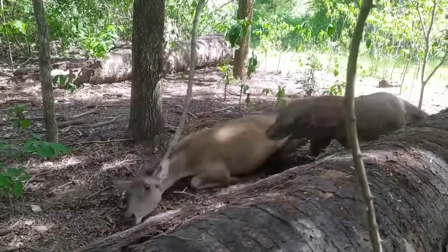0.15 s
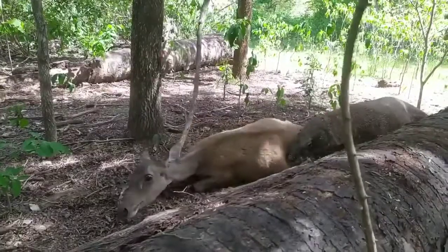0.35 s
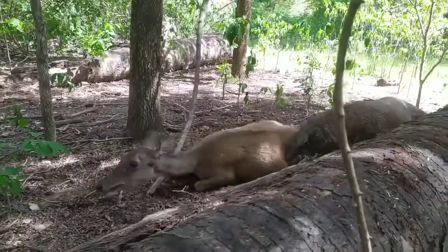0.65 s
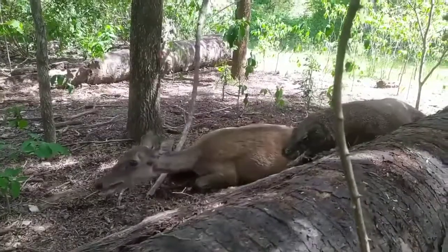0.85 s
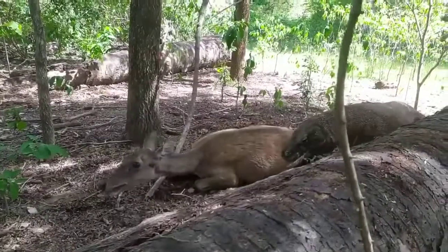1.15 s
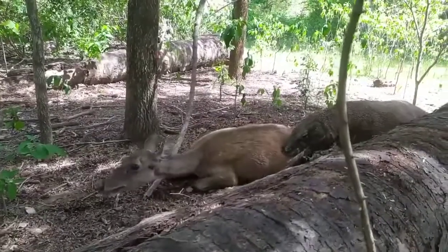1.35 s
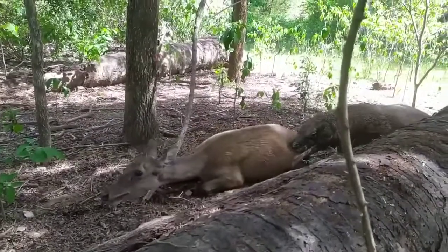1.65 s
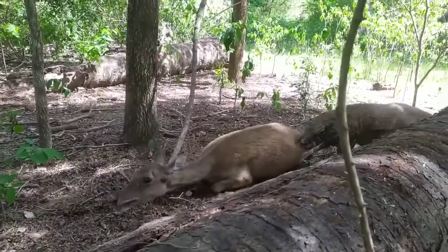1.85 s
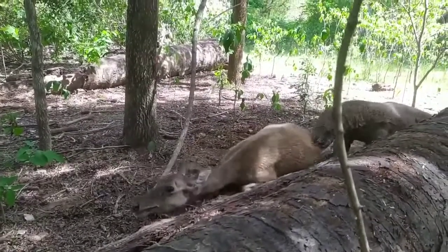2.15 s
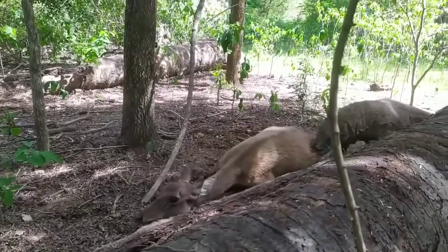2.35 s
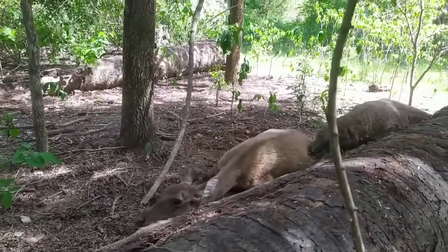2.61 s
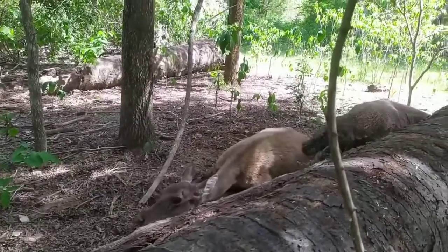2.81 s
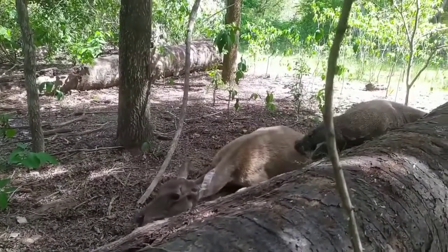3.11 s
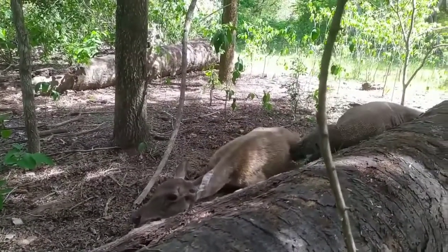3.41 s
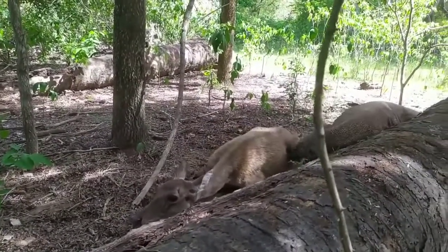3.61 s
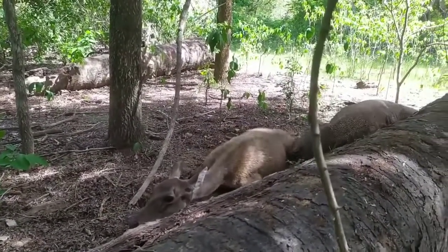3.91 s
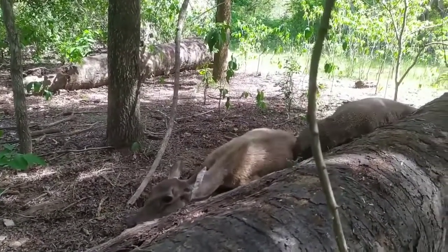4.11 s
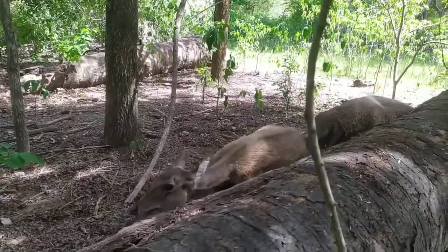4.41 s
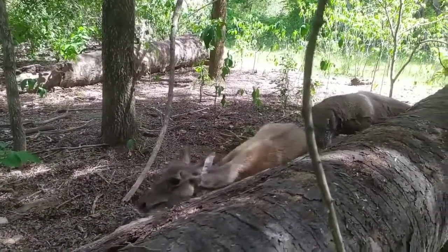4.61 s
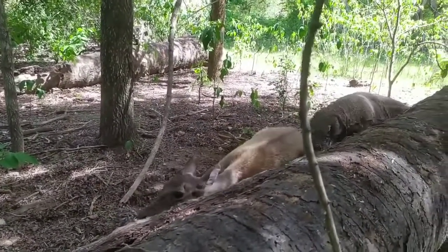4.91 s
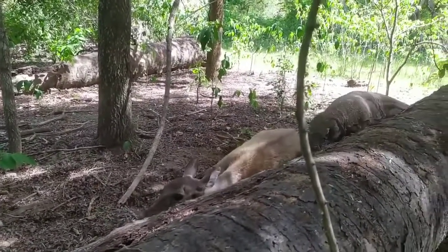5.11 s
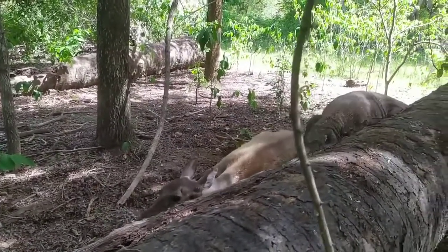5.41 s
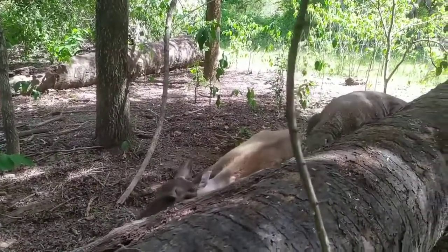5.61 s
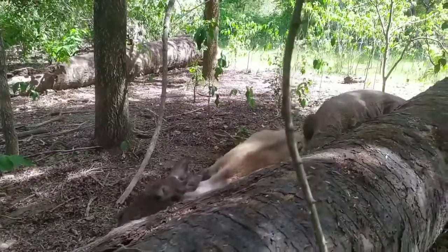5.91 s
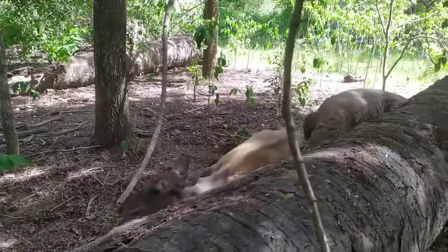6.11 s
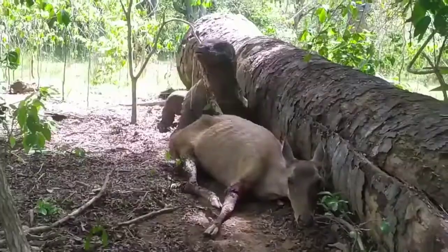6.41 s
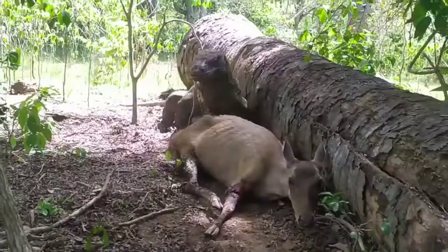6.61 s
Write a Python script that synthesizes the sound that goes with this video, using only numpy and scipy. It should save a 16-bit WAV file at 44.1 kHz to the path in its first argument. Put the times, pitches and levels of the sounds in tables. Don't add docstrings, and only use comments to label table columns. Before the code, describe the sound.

Outdoors among trunks, a large animal shifts on dry litter, rustling, rubbing bark and thumping soft soil. A single deer bleat dominates the middle, starting rough, breaking upward into a fluttering squeal and slackening back to a growl, with short woody echoes. Afterwards come scattered twig cracks, a splitting stick, leaf slips and two quiet closed-mouth grunts. Distant dove, small bird near the end, steady dull engine; two spaced microphones.

```python
import sys
import numpy as np
from scipy import signal
from scipy.io import wavfile
from scipy.ndimage import uniform_filter1d

SR = 44100
rng = np.random.default_rng(int(sys.argv[2]) if len(sys.argv) > 2 else 0)


def master_out(mix):
    frames = np.transpose(np.atleast_2d(mix))
    ceiling = np.clip(frames, -1, 1)
    pcm = np.round(ceiling * 32767).astype(np.int16)
    wavfile.write(sys.argv[1], SR, pcm)


def amplitude_ratio(level_db):
    exponent = np.asarray(level_db, float) / 20
    return 10 ** exponent


N = 297675

# centre_hz, width_hz, level_db
OPEN_THROAT = [(343, 170, -6.5), (570, 177, -1), (759, 43, 13.5), (1435, 322, 0.5), (1745, 61, 9),
               (1955, 132, 4.5), (2380, 400, -8.5), (2900, 230, -17), (3840, 200, -31), (5200, 640, -18.5),
               (6700, 730, -20.5), (8400, 820, -19.5)]
# time_s, gain_db
BACKGROUND_DIP = [(2.35, 0.5), (2.5, -1.5), (2.85, -4), (3.2, -7), (3.62, -10.5), (3.7, -1.5)]
LITTER_DROP_S = 6.235


def deer():
    # time_s, left_delay_samples
    head = [(2.3, 10.8), (2.75, 12.1), (2.9, 11.8), (3.1, 11), (3.2, 14.45), (3.3, 11.14), (3.7, 12.2)]
    voice = rising_growl() + falling_growl() + squeal()
    voice = butter(voice, 4, 11000, "low")
    heard = add_echoes(place(voice, in_time(head)[0] / SR))
    return heard + jet() + forest(heard) + place(grunts(), 0.00031, pan_db=2.0)


def squeal():
    # time_s, pitch_hz, first_db, second_over_first_db, third_over_first_db
    registers = [
        [(2.67, 579, -30, -18, -16.5), (2.692, 619.4, -21, -23, -15), (2.715, 670.3, -18.5, -15.5, -21),
         (2.75, 719, -26, -11.5, -18.5), (2.776, 749, -26, -15, -17.5)],
        [(2.778, 844, -24, -5, -20.5), (2.802, 954, -32, 5.5, -17.5), (2.852, 1047, -28.5, -3.5, -13),
         (2.93, 1089, -29.5, 4, -15.5), (3.01, 1136, -26.5, -8.5, -22), (3.06, 1101, -26, 1.5, -17.5),
         (3.104, 1056, -20.5, 1, -16), (3.135, 984, -18, 8, -18), (3.166, 919, -17, -6, -25)],
        [(3.174, 767.5, -11, -10.5, -17), (3.23, 731, -9, -4.5, -7.5), (3.265, 715.7, -19.5, -8, -1),
         (3.275, 672, -40, -9, 6)],
    ]
    # partial_hz, level_db
    higher_spectra = [
        [(2400, -41), (3500, -51.5), (4000, -63.5), (9000, -81)],
        [(3700, -52.5), (4500, -50.5), (5400, -49.5), (6500, -54), (7600, -62.5), (8750, -50), (9900, -61.5),
         (11500, -73.5)],
        [(2900, -31), (3700, -43.5), (4500, -44.5), (5300, -50), (6700, -58.5), (9000, -58)],
    ]
    # time_s, level_db
    half_lines = [(2.675, -66.5), (2.7, -44.5), (2.725, -41), (2.75, -71)]
    # time_s, upper_partials_db
    closure_snap = [(2.8, -2), (2.88, 0), (2.95, -3.5), (3.02, 6), (3.07, 0), (3.14, 10.5), (3.168, 6.5),
                    (3.174, -5.5), (3.21, 4.5), (3.275, -10)]
    # time_s, centre_hz, gain_db
    cavity = [(2.9, 6400, 0), (2.95, 6100, -11.5), (3.03, 5650, -14.5), (3.085, 5300, -23),
              (3.135, 4500, -12), (3.168, 4300, -14), (3.174, 4300, 0.5)]
    cavity_width_hz, settled_s = 770, 2.79

    rows = sum(registers, [])
    now, out = during(rows), np.zeros(N)
    hz, first_db, second_db, third_db = np.array(in_time(rows))[:, now]
    upper_db = np.zeros((9, len(hz)))
    for register, spectrum in zip(registers, higher_spectra):
        inside = sounding(register)[now] > 0
        hz[inside] = uniform_filter1d(in_time(register)[0], size=900)[now][inside]
        since = np.arange(N)[now] >= register[0][0] * SR
        upper_db[:, since] = at_hz(spectrum, np.arange(4, 13)[:, None] * hz[since])

    unsettled = np.arange(N) < settled_s * SR
    waver = 0.0015 * drift(70) + 0.008 * drift(200) * unsettled
    phase = 2 * np.pi * np.cumsum(hz * (1 + waver[now])) / SR

    cavity_hz, cavity_db = np.array(in_time(cavity))[:, now]
    snap_db = in_time(closure_snap)[0][now]
    half_db = (in_time(half_lines)[0] - 60 * (1 - sounding(half_lines)))[now]
    levels = [(1, first_db), (2, first_db + second_db), (3, first_db + third_db)]
    for k, db in enumerate(upper_db, 4):
        swallowed_db = cavity_db * np.exp(-((k * hz - cavity_hz) / cavity_width_hz) ** 2)
        levels.append((k, db + snap_db + swallowed_db))
    for k, db in enumerate([-8.5, 7.5, 4, -3.5], 1):
        levels.append((k + 0.5, db + half_db))
    for k, db in levels:
        flutter_db = 0.45 * min(k, 4) * drift(15)[now]
        out[now] += amplitude_ratio(db + 1.5 + flutter_db) * np.sin(k * phase + 0.66 * k ** 2)

    low_throat = [row for row in OPEN_THROAT if row[0] < 1000]
    breath = rms_one(body(rng.standard_normal(len(hz)), low_throat))
    out[now] += amplitude_ratio(first_db - 40 + 10 * unsettled[now]) * breath
    return sounding(rows) * out


def rising_growl():
    # time_s, pulse_rate_hz, roughness_0_to_1, chest_db
    pulses = [(2.28, 88, .5, -55), (2.34, 92, .6, -50), (2.5, 101, .6, -50), (2.56, 110, .5, -55),
              (2.575, 200, .2, -68), (2.685, 236, .2, -76)]
    # time_s, level_db
    effort = [(2.28, -74), (2.308, -54), (2.316, -48.5), (2.372, -34), (2.428, -39), (2.568, -33),
              (2.586, -38.5), (2.655, -32.5), (2.685, -47)]
    # time_s, centre_hz
    lips = [(2.3, 673), (2.37, 672), (2.431, 690), (2.46, 650), (2.5, 650), (2.54, 646.5), (2.575, 672),
            (2.599, 601), (2.66, 663)]
    # centre_hz, width_hz, level_db
    throat = [(245, 63, -25.5), (377.5, 60, -3), (470, 190, -7.5), (644, 20.4, 8), (900, 71, -16.5),
              (1618, 280, -15), (2473, 160, -15.5), (2950, 310, -23), (3460, 360, -26), (3580, 140, -22.5),
              (6640, 440, -33), (8740, 680, -36.5)]
    # time_s, pitch_hz, level_db
    glide = [(2.42, 214.6, -61), (2.48, 261.7, -57), (2.54, 309.1, -54), (2.586, 392.4, -42),
             (2.602, 418.3, -46.5), (2.639, 441.6, -44.5), (2.665, 472, -49.5), (2.68, 570, -45.5)]
    hz, rough, chest_db = in_time(pulses)
    voice = growl(pulses, hz, in_time(effort)[0] + 2.0, rough, chest_db, throat, lips)
    octave = np.array(glide) * [1, 2, 1] - [0, 0, 15.0]
    return voice + tone(glide) + tone(octave)


def falling_growl():
    # time_s, pulse_rate_hz, roughness_0_to_1
    pulses = [(3.265, 142, .7), (3.396, 125.4, .4), (3.44, 117.3, .05), (3.506, 108, .04),
              (3.594, 101.8, .04), (3.64, 92.6, .08), (3.678, 81, .18), (3.71, 78, .25)]
    # time_s, level_db, chest_db
    effort = [(3.265, -26.5, -45), (3.297, -24, -40), (3.419, -30.5, -38.5), (3.649, -32, -40),
              (3.672, -45, -44.5), (3.69, -47, -45), (3.71, -82, -67)]
    # time_s, centre_hz
    lips = [(3.265, 770), (3.31, 767), (3.37, 750), (3.419, 810), (3.451, 752), (3.522, 784), (3.598, 739),
            (3.66, 740), (3.71, 634)]
    hz, rough = in_time(pulses)
    level_db, chest_db = in_time(effort)
    return growl(pulses, hz, level_db + 3.5, rough, chest_db, OPEN_THROAT, lips)


def grunts():
    # time_s, pulse_rate_hz, level_db
    pulse_trains = [
        [(5.8, 106, -66), (5.828, 114, -54), (5.904, 123, -49), (5.96, 70, -68)],
        [(6.03, 140, -76), (6.056, 102, -44.5), (6.13, 144, -68.5)],
    ]
    # centre_hz, width_hz, level_db
    throat = [(252, 62, 11.5), (407, 110, 7), (567, 120, 5.5), (900, 85, 3), (1097, 30, 6)]
    out = np.zeros(N)
    for rows in pulse_trains:
        hz, level_db = in_time(rows)
        out += growl(rows, hz, level_db, np.full(N, 0.35), level_db - 9, throat)
    return out


def growl(rows, hz, level_db, rough, chest_db, throat, lips=None):
    cycles = np.cumsum(hz * (1 + 0.035 * rough * drift(60))) / SR
    closures = np.diff(np.floor(cycles), prepend=0)
    pulses = closures * amplitude_ratio(3.0 * rough * drift(150)) * np.sqrt(SR / hz)
    breath = rng.standard_normal(N) * (0.91 + np.exp(-3 * (cycles % 1)))

    now, voiced = during(rows), np.zeros(N)
    strongest_db = max(row[2] for row in throat)
    for k, (mode_hz, width_hz, db) in enumerate(throat):
        airy = np.clip(rough[now] * (0.6 + mode_hz / 1200), 0, 0.95)
        source = np.sqrt(1 - airy) * pulses[now] + np.sqrt(airy) * breath[now]
        if lips is not None and db == strongest_db:
            rung = sliding(source, in_time(lips)[0][now], width_hz)
        else:
            rung = resonate(source, mode_hz, width_hz)
        voiced[now] += (-1) ** k * amplitude_ratio(db) * rung
    voiced = voiced / np.sqrt(uniform_filter1d(voiced ** 2, size=1500) + 1e-12)

    chest = np.zeros(N)
    for k, db in [(1, 3.0), (2, -6.5), (3, -8), (4, -9.5)]:
        lift_db = 10.5 * np.exp(-((k * hz - 320) / 84) ** 2)
        partial_db = chest_db + db - 12.0 * rough * (k > 2) + lift_db
        chest += amplitude_ratio(partial_db) * np.sin(2 * np.pi * k * cycles)
    return sounding(rows) * (amplitude_ratio(level_db) * voiced + chest)


def jet():
    # time_s, level_db
    flow = [(2.4, -72), (2.5, -65), (2.67, -60.5), (2.715, -44), (2.74, -65), (3.09, -58.5), (3.14, -46),
            (3.19, -55.5), (3.275, -57.5), (3.29, -78)]
    air = butter(rng.standard_normal((2, N)), 4, [5300, 11500], "band")
    return sounding(flow) * amplitude_ratio(in_time(flow)[0]) * rms_one(air)


def add_echoes(heard):
    # delay_s, level_db, side_0_left_1_right
    reflections = [
        (.0021, -7.5, 0),
        (.0034, -10.5, 1),
        (.0087, -26.5, 0),
        (.0066, -5.5, 1),
        (0.032, -24.5, 0),
        (.043, -39.5, 1),
    ]
    bounced = butter(heard, 2, 600, "high")
    for delay_s, db, side in reflections:
        lag = round(delay_s * SR)
        heard[side, lag:] += amplitude_ratio(db) * bounced[side, :-lag]
    return heard


def forest(x):
    t, t60_s = np.arange(SR // 2) / SR, 0.89
    tail = resonate(rng.standard_normal((2, len(t))), 750, 910)
    tail = tail * amplitude_ratio(-60 * t / t60_s) * np.minimum(t / 0.017, 1)
    tail = tail / np.sqrt(np.sum(tail ** 2) / 2)
    return amplitude_ratio(-42) * signal.oaconvolve(x, tail, axes=1)[:, :N]


def leaves():
    # start_s, length_s, hiss_db, scuff_over_hiss_db
    stirs = [(-.1, 0.51, -58, 2), (0.042, 0.21, -53, 3.5), (0.278, 0.37, -64, -0.5), (0.84, 0.35, -63, 0),
             (1.48, 0.6, -62, -2), (1.807, 0.3, -75, 8.5), (2.033, 1, -63, -0.5), (3.918, 0.075, -72.5, -9),
             (4.164, 0.15, -64, 2), (4.42, 0.33, -62, -2), (4.995, 0.14, -62, -14.5),
             (5.197, 0.37, -71, 1.5), (5.438, 0.32, -57, -4), (5.472, 0.21, -64, 15),
             (5.738, 0.5, -56.5, -1.5), (5.974, .25, -85, 3), (6.595, 0.25, -62.5, -6)]
    # start_s, length_s, level_db
    drags = [
        (-.1, 0.77, -62),
        (.05, 0.23, -55.5),
        (1.82, 0.26, -64.5),
        (4.28, 0.28, -63),
        (5.45, 0.26, -63),
        (5.74, 0.51, -68),
    ]
    # start_s, length_s, level_db
    slips = [
        (3.94, 0.18, -61),
        (5.1, 0.078, -58),
        (6.15, 0.1, -53),
    ]
    # start_s, length_s, level_db
    rubs = [
        (.09, 0.19, -55.5),
        (.29, .17, -63.5),
    ]
    # frequency_hz, density_db_per_hz
    hiss_spectrum = [(1760, -37.5), (3000, -5.5), (3890, -20.5), (4630, -10), (6530, 8.5), (9730, 2),
                     (14600, -13), (16000, -24)]
    scuff_spectrum = [(700, -33), (1100, -3.5), (2000, 2), (3200, -5), (4500, -5.5), (7000, -24)]
    drag_spectrum = [(90, -43), (170, -9), (400, -9.5), (900, -10), (1500, -15.5)]
    # time_s, left_over_right_db
    direction = [(0, 2), (2.2, 3), (4.5, 3), (5.6, 5), (6.22, 1), (6.26, 1.5)]

    fainter = np.arange(N) > LITTER_DROP_S * SR
    hiss_gain = stirred([row[:3] for row in stirs], still_db=-66.5) * amplitude_ratio(4.5 - 5 * fainter)
    hiss = hiss_gain * rustle(hiss_spectrum, patchy_db=1.5, grain_db=1.5)
    scuff_moves = [(s, length_s, db + over_db) for s, length_s, db, over_db in stirs]
    scuff = stirred(scuff_moves, still_db=-64) * rustle(scuff_spectrum, patchy_db=1.5, grain_db=2)
    drag = stirred(drags, still_db=-68) * amplitude_ratio(1.5) * rustle(drag_spectrum, patchy_db=1.5, grain_db=1.0)
    slip = stirred(slips, -120) * rms_one(resonate(rng.standard_normal((2, N)), 5900, 1100))
    rub = stirred(rubs, -120) * rms_one(resonate(rng.standard_normal(N), 1910, 81))
    litter = amplitude_ratio(in_time(BACKGROUND_DIP)[0]) * (hiss + scuff) + slip + rub
    return litter * amplitude_ratio(in_time(direction)[0] / 2 * [[1], [-1]]) + drag


def stirred(moves, still_db):
    t = np.arange(N) / SR
    power = amplitude_ratio(2 * (still_db - 2 * (t > LITTER_DROP_S)))
    for s, length_s, db in moves:
        edge_s = min(0.069, 0.66 * length_s)
        swell = np.clip(np.minimum(t - s, s + length_s - t) / edge_s, 0, 1)
        power = power + (amplitude_ratio(db) * swell) ** 2
    return np.sqrt(power)


def rustle(spectrum, patchy_db, grain_db):
    # frequency_hz, likeness_0_to_1
    likeness = [(60, 0.84), (300, 0.82), (700, 1), (1500, 0.49), (4000, 0.021), (12000, 0.1)]
    out, together = 0, drift(24.0)
    edges = np.geomspace(spectrum[0][0], min(spectrum[-1][0], 0.45 * SR), 9)
    white = rng.standard_normal((2, 2, N)) * amplitude_ratio(grain_db * drift(250))
    for k, (low, high) in enumerate(zip(edges, edges[1:])):
        mid, side = butter(white[k % 2], 2, [low, high], "band")
        hz = np.sqrt(low * high)
        alike = np.clip(at_hz(likeness, hz), 0, 1)
        gain = amplitude_ratio(at_hz(spectrum, hz) + patchy_db * (0.85 * together + drift(10)))
        out = out + gain * (np.sqrt(1 + alike) * mid + np.sqrt(1 - alike) * side * [[1], [-1]])
    out[0] = np.roll(out[0], 12)
    return rms_one(out)


def snaps():
    # time_s, peak_db, left_over_right_db, centre_hz
    twigs = [(0.097, -36, -8, 7920), (0.167, -38, 1, 7270), (0.43, -28, 2, 10100), (1.978, -33.5, 0, 8340),
             (1.99, -29, -6, 8640), (1.9895, -27, 7, 1550), (2.128, -28, 0, 1700), (2.165, -29.5, 2, 9100),
             (4.607, -33, 7, 8400), (4.6483, -34.5, 4, 4340), (4.94, -45, 18, 6300),
             (5.0254, -25.5, 9, 6460), (5.036, -26.5, 3, 5200), (5.099, -34, 1, 7000),
             (5.1126, -33.5, 14, 5700), (5.1299, -20, 10, 6600), (5.165, -43, 14, 6140),
             (5.2474, -37, 7, 6240), (5.4672, -42, 4, 6200), (5.645, -26.5, 13, 7700),
             (5.865, -30, 8, 8400), (5.937, -32, 6, 9000), (5.955, -28, 16, 8700), (5.985, -33, 21, 8000),
             (6.172, -46, 17, 7040), (6.184, -31.5, 18.5, 7770)]
    # time_s, peak_db
    split = [(4.8271, -48), (4.8265, -29.5), (4.8302, -31), (4.834, -28), (4.8384, -39.5), (4.843, -32),
             (4.847, -38), (4.852, -36.5), (4.858, -38), (4.868, -38), (4.882, -49)]
    out, t = np.zeros((2, N)), np.arange(6000) / SR
    # t60_s, width_octaves; the stick also gets pan_db, centre_hz
    cracks = [(*row, 0.013, 1.12) for row in twigs]
    cracks += [(*row, 12, 5900, 0.042, 2.4) for row in split]
    chance = rng.standard_normal((len(cracks), 3, 6000))
    for (s, peak_db, pan_db, hz, t60_s, octaves), (grain, left, right) in zip(cracks, chance):
        fibres = np.array([grain + 0.7 * left, grain + 0.7 * right]) * amplitude_ratio(4.0 * np.roll(grain, 7))
        crackle = 0.36 * fibres * amplitude_ratio(-60 * t / max(t60_s, 0.003))
        crackle[:, 0] = 3.2
        band_hz = [hz / 2 ** (0.42 * octaves), min(hz * 2 ** (0.19 * octaves), 16000)]
        crackle = butter(crackle, 2, band_hz, "band")
        crackle[0] = np.roll(crackle[0], 14)
        start = round(s * SR)
        out[:, start:start + 6000] += amplitude_ratio(peak_db + pan_db / 2 * np.array([[1], [-1]])) * crackle
    return out


def thuds():
    # time_s, peak_db, ring_hz, t60_s, puff_db
    blows = [(0.165, -41, 90, 0.086, -9.5), (0.192, -35, 101, 0.14, -40), (0.517, -42, 80.7, 0.026, -7),
             (0.2, -46.5, 58, 0.3, -36), (1.141, -41, 68, 0.28, -27), (1.985, -44.5, 88, 0.29, -3.5),
             (2.125, -36.5, 103, 0.027, -22.5), (4.546, -37.5, 90, 0.089, -26.5),
             (5.467, -44.5, 602, 0.042, -30), (5.502, -45.5, 135, 0.09, -20),
             (5.825, -46.5, 66.4, 0.15, -9.5), (5.941, -34, 58.6, 0.041, -35)]
    out, t = np.zeros(N), np.arange(9000) / SR
    puffs = signal.lfilter([0.03], [1, -1.8, 0.81], rng.standard_normal((len(blows), 9000)))
    for (s, peak_db, hz, t60_s, puff_db), puff in zip(blows, puffs):
        ring = np.sin(2 * np.pi * hz * t) * amplitude_ratio(-60 * t / t60_s)
        blow = ring + amplitude_ratio(puff_db + 16.5) * puff * amplitude_ratio(-60 * t / 0.059)
        start = round(s * SR)
        out[start:start + 9000] += amplitude_ratio(peak_db) * blow * np.minimum(t / 0.0033, 1)
    return place(out, 0.0001)


def dove():
    # time_into_call_s, pitch_hz, level_db
    coo = [(0, 854, -73), (.075, 892, -67.5), (.092, 1109, -63.5), (0.117, 1037, -72), (.137, 890, -62),
           (0.152, 1060, -60.5), (.195, 1074, -71), (0.266, 997, -62), (0.28, 900, -70)]
    # start_s, level_db
    calls = [
        (1.067, -0.5),
        (5.088, -0.5),
    ]
    return bird([np.array(coo) + [s, 0, db] for s, db in calls], 0.00031, pan_db=7.0)


def chirps():
    # time_s, pitch_hz, level_db
    notes_sung = [
        [(6.49, 4750, -78), (6.5, 4950, -73), (6.53, 5200, -80)],
        [(6.555, 5050, -78), (6.575, 5150, -74), (6.617, 4950, -76)],
        [(6.515, 4800, -76), (6.53, 4550, -72), (6.55, 4250, -76)],
        [(6.63, 3900, -73), (6.69, 4420, -68), (6.73, 4280, -69), (6.75, 3850, -77)],
    ]
    return amplitude_ratio(-7 + 4 * drift(60)) * bird(notes_sung, 0.00044, pan_db=6)


def bird(whistles, lag_s, pan_db):
    out = sum(tone(rows) for rows in whistles)
    return place(out + amplitude_ratio(-8.5) * np.roll(out, 1900), lag_s, pan_db)


def engine():
    # time_s, engine_cycles
    crank = [(-.018, 0), (1.908, 26), (3.828, 52), (6.235, 85), (6.284, 86), (6.785, 93)]
    # time_s, level_db
    throb_level = [(0.0, -58), (0.96, -62.5), (1.76, -60.5), (3.8, -61.5), (5.58, -63.5), (5.98, -59),
                   (6.4, -66.5)]
    # centre_hz, width_hz, level_db
    exhaust = [(57.4, 28, -3), (94.5, 27, -1), (125, 53.3, -8.5)]
    firing = np.floor(2 * in_time(crank)[0] + 0.55)
    pulses = np.diff(firing, prepend=firing[0]) * amplitude_ratio(-6.0 * (firing % 2) + 1.3 * drift(22))
    rumble = rms_one(body(rng.standard_normal((2, N)), exhaust))
    throb = rms_one(body(pulses, exhaust)) + amplitude_ratio(1.0) * rumble[0]
    return amplitude_ratio(in_time(throb_level)[0] + 0.5) * (throb + amplitude_ratio(-11.5) * rumble[1] * [[1], [-1]])


def tone(rows):
    hz, db = in_time(rows)
    return sounding(rows) * amplitude_ratio(db + 12 + 1.5 * drift(30)) * np.sin(2 * np.pi * np.cumsum(hz) / SR)


def resonate(x, hz, width_hz):
    r = np.exp(-np.pi * width_hz / SR)
    b = [(1 - r * r) / 2, 0, (r * r - 1) / 2]
    return signal.lfilter(b, [1, -2 * r * np.cos(2 * np.pi * hz / SR), r * r], x + 1e-18)


def sliding(x, hz, width_hz):
    r, out, state = np.exp(-np.pi * width_hz / SR), np.zeros(len(x)), np.zeros(2)
    b = [(1 - r * r) / 2, 0, (r * r - 1) / 2]
    for i in range(0, len(x), 128):
        a = [1, -2 * r * np.cos(2 * np.pi * hz[i] / SR), r * r]
        out[i:i + 128], state = signal.lfilter(b, a, x[i:i + 128], zi=state)
    return out


def body(x, modes):
    return sum((-1) ** k * amplitude_ratio(db) * resonate(x, hz, width_hz) for k, (hz, width_hz, db) in enumerate(modes))


def place(x, lag_s, pan_db=0):
    late = np.interp(np.arange(N) - lag_s * SR, np.arange(N), x)
    return np.array([late * amplitude_ratio(pan_db / 2), x * amplitude_ratio(-pan_db / 2)])


def butter(x, order, hz, kind):
    return signal.sosfilt(signal.butter(order, hz, kind, fs=SR, output="sos"), x)


def drift(rate_hz):
    r = np.exp(-40 * np.pi * rate_hz / SR)
    slow = signal.lfilter([1], [1, -2 * r, r * r], rng.standard_normal(N // 20 + 2002))[2000:]
    return np.interp(np.arange(N) / 20, np.arange(len(slow)), rms_one(slow))


def rms_one(x):
    return x / np.sqrt(np.mean(x ** 2) + 1e-20)


def in_time(rows):
    s, *columns = np.transpose(rows)
    return [np.interp(np.arange(N) / SR, s, c) for c in columns]


def sounding(rows, fade_s=0.0029):
    t = np.arange(N) / SR
    return np.clip(np.minimum(t - rows[0][0], rows[-1][0] - t) / fade_s, 0, 1)


def during(rows):
    return slice(round(rows[0][0] * SR), round(rows[-1][0] * SR))


def at_hz(points, hz):
    points_hz, db = np.transpose(points)
    return np.interp(np.log(hz), np.log(points_hz), db)


def scene():
    return deer() + leaves() + snaps() + thuds() + chirps() + dove() + engine()


def band_limit(x):
    return signal.sosfilt(signal.butter(12, 15800, fs=SR, output="sos"), x)


def record(dry):
    hiss = butter(rng.standard_normal(dry.shape), 2, 10000, "high")
    mix = dry + amplitude_ratio(-66 + 2 * in_time(BACKGROUND_DIP)[0]) * hiss
    mix = butter(mix, 2, 45, "high")
    mix = signal.sosfilt(signal.cheby2(10, 60, 16600, fs=SR, output="sos"), mix)
    return band_limit(mix)


dry = scene()
out = record(dry)
master_out(out)
```